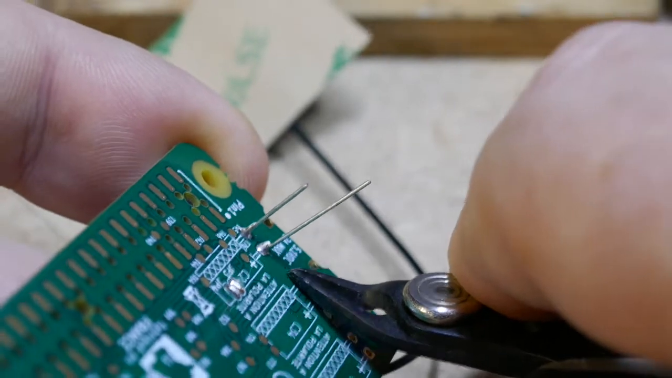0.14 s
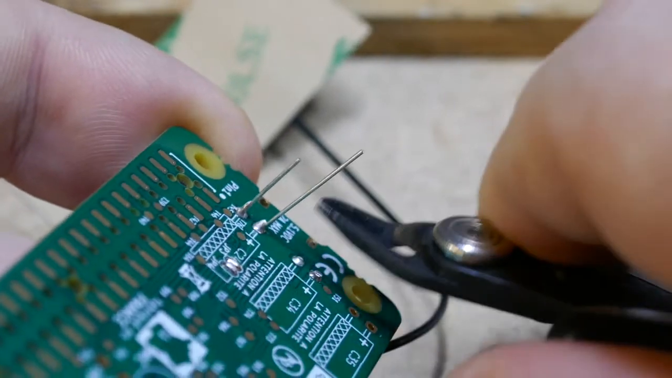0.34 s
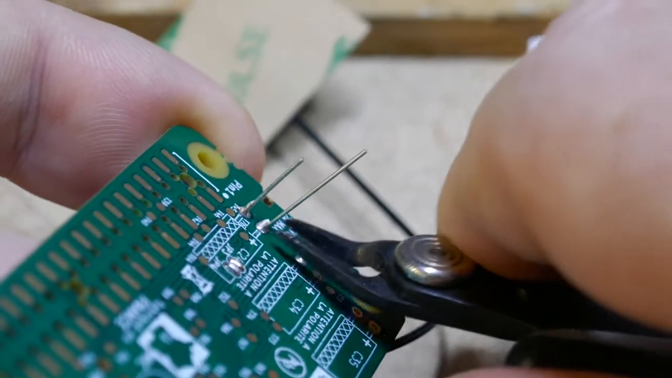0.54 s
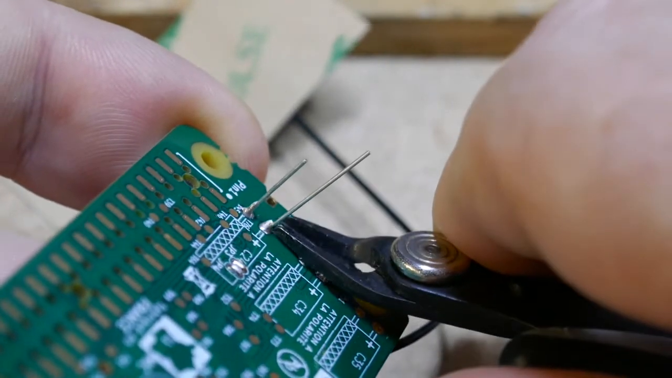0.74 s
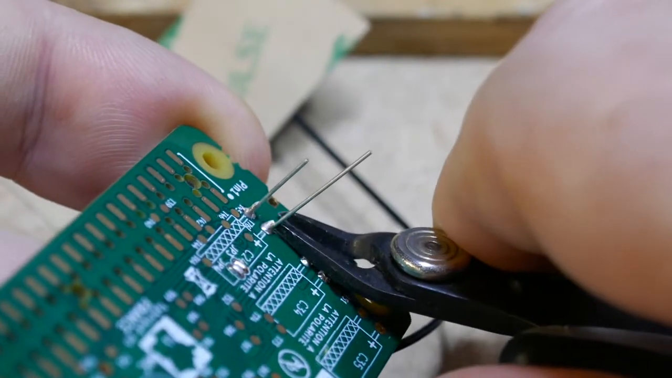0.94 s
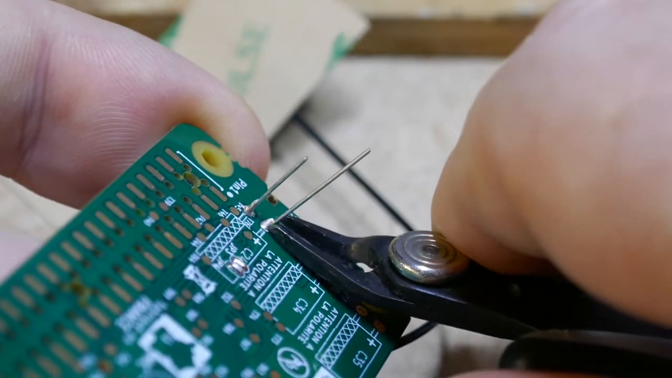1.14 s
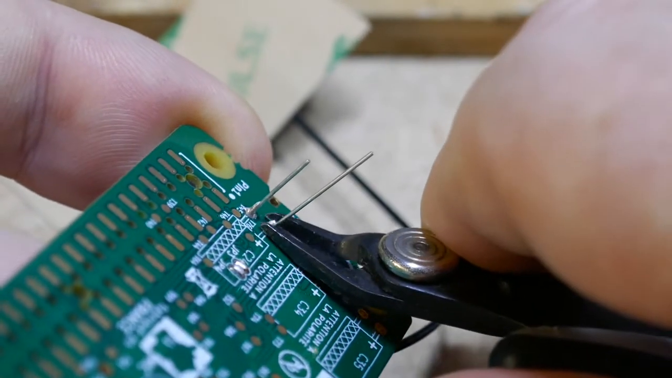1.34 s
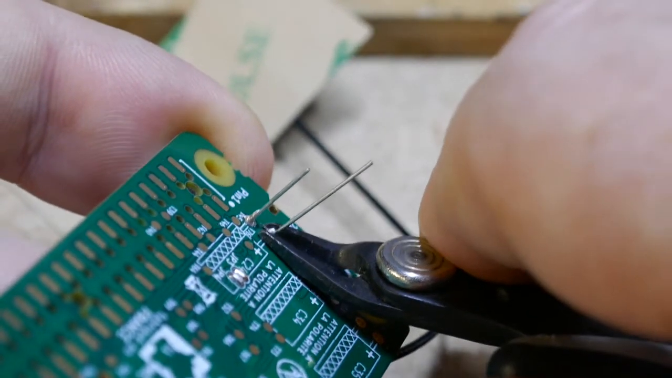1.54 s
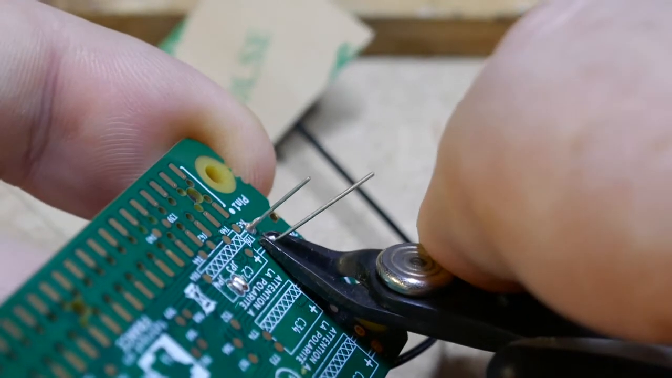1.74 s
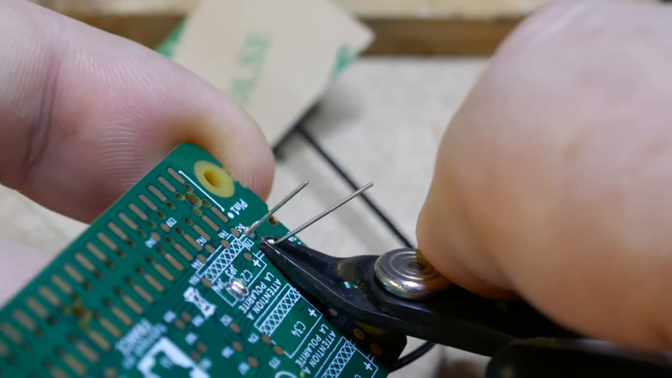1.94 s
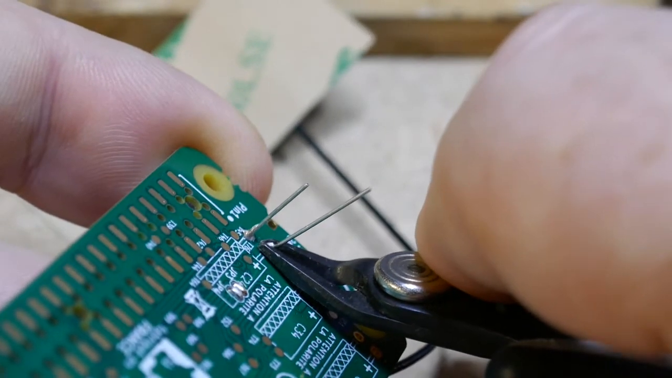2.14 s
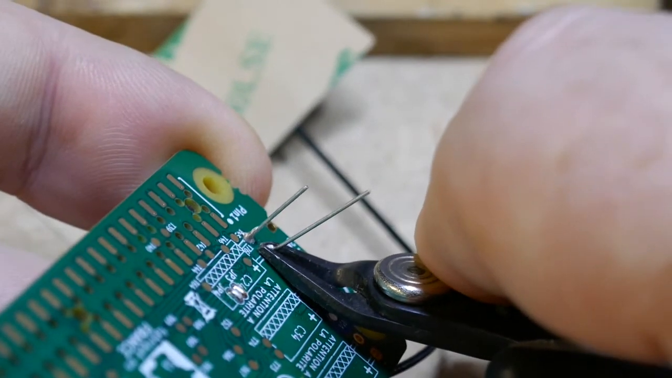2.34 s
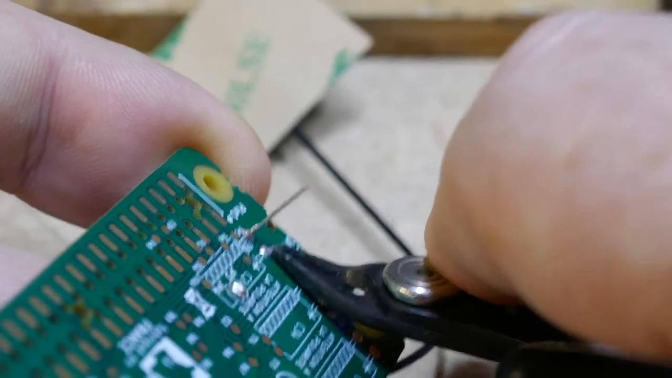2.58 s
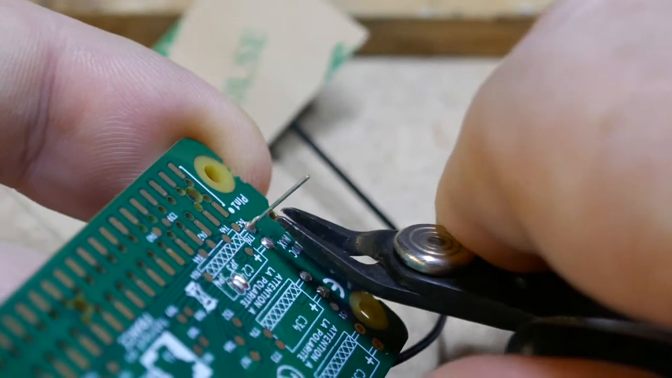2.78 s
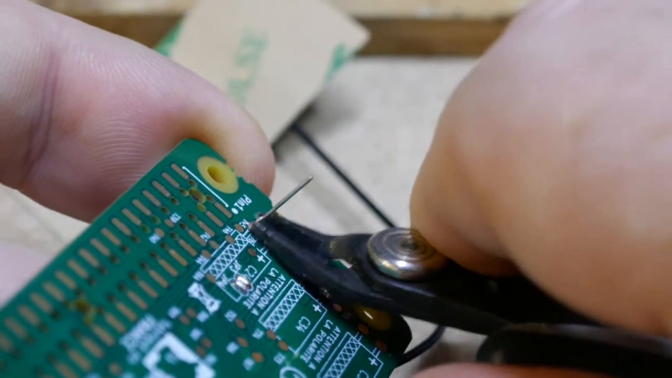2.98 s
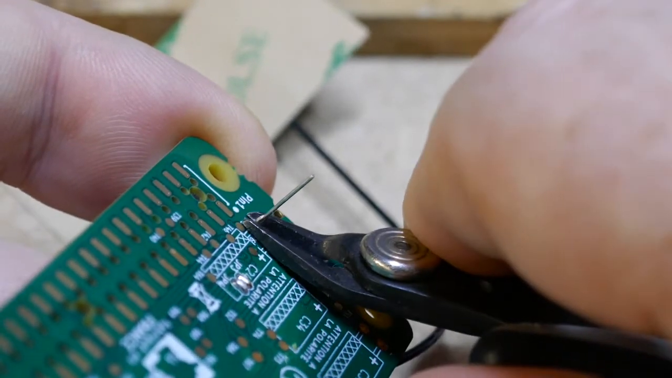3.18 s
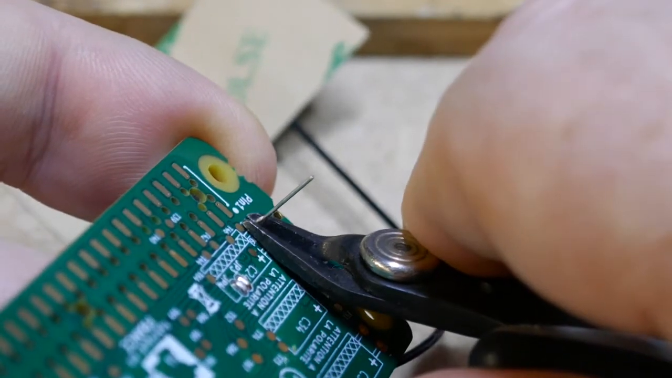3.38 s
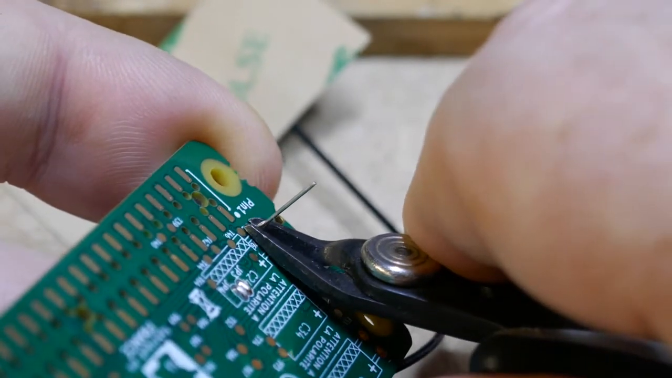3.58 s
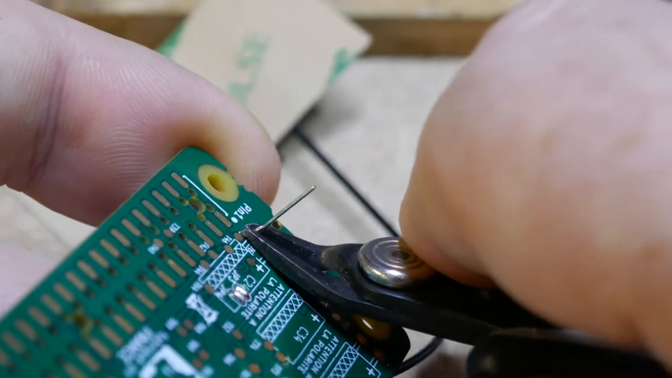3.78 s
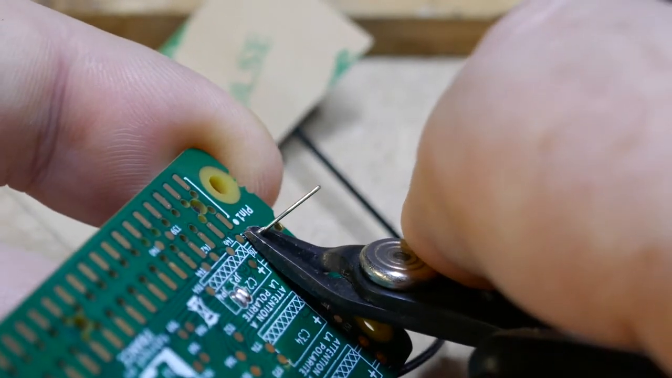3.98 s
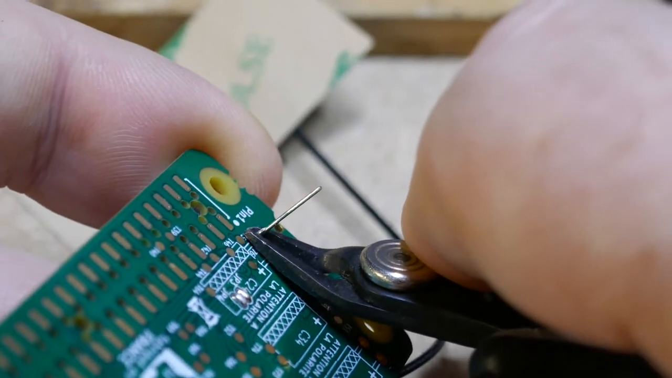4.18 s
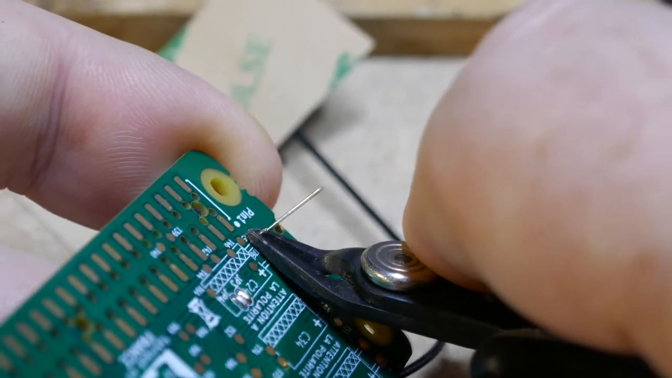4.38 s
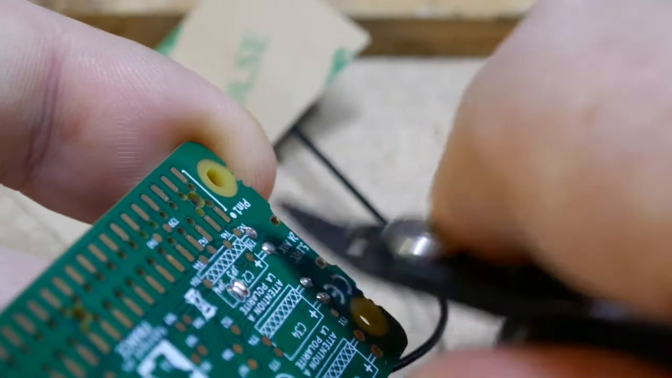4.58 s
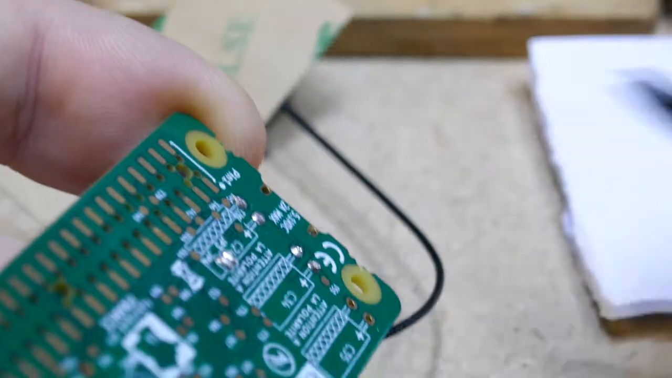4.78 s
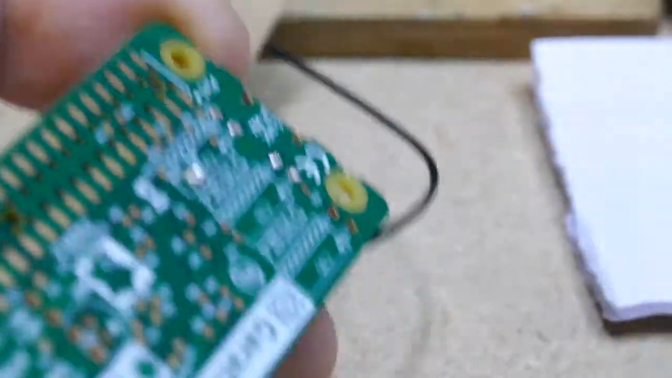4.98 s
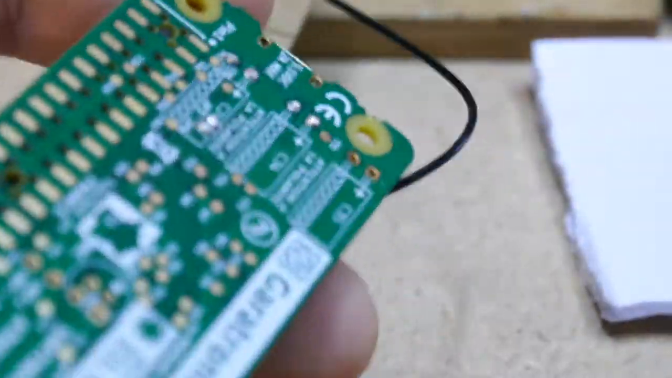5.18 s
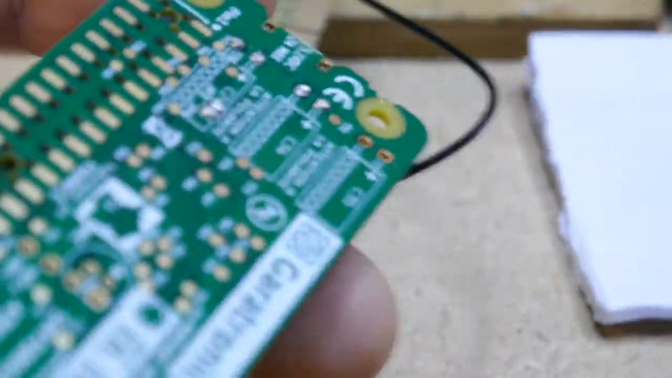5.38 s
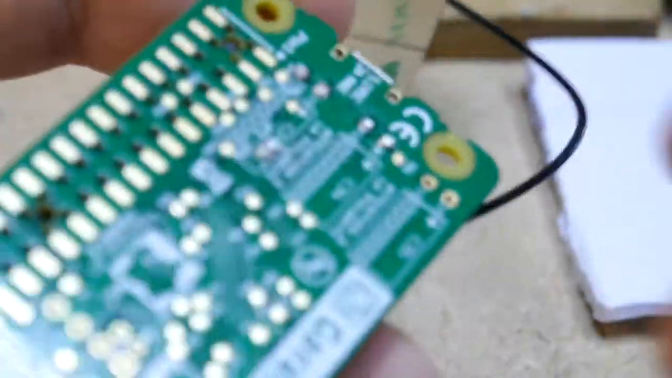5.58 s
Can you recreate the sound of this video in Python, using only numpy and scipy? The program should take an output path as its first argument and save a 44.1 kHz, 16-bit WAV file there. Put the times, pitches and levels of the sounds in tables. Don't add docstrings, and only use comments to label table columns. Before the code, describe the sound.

Hand-held circuit board being trimmed at a workbench, heard very close. Each cut is one crisp, bright steel snap with little body and a short room tail. Long, nearly silent gaps hold only tiny ticks and faint room tone with soft hiss. After the third snap the cutters go down in a woody, rattling clatter with sliding friction, much louder than the snips, and light clicks finish it.

```python
import sys
import numpy as np
from scipy import signal
from scipy.fft import rfft, irfft
from scipy.io import wavfile
from scipy.ndimage import uniform_filter1d

SR = 44100
rng = np.random.default_rng(int(sys.argv[2]) if len(sys.argv) > 2 else 0)


def persist_wave(psi):
    counts = np.round(np.clip(psi, -1, 1) * 32767).astype(np.int16)
    wavfile.write(sys.argv[1], SR, np.atleast_2d(counts).T)


def voltage_ratio(level):
    return 10 ** (np.asarray(level, float) / 20)


N = 247974


def rms_one(x):
    return x / np.sqrt(np.mean(x ** 2) + 1e-20)


def at_hz(points, hz):
    table_hz, value = np.transpose(points)
    return np.interp(np.log(hz), np.log(table_hz), value)


def band(x, low_hz, high_hz):
    return signal.sosfilt(signal.butter(2, [low_hz, high_hz], "band", fs=SR, output="sos"), x)


def sides(pan_db):
    return voltage_ratio(np.array([[0.5], [-0.5]]) * pan_db)


def widen(shared, own, share):
    return shared + share * own * np.array([[1], [-1]])


def add(out, start_s, sound):
    at = round(start_s * SR)
    out[:, at:at + sound.shape[1]] += sound[:, :N - at]


def resonate(x, peaks, scatter_db=0):
    out = 0
    for k, (hz, width_hz, level_db) in enumerate(peaks):
        r = np.exp(-np.pi * width_hz / SR)
        w = 2 * np.pi * hz / SR
        strength = voltage_ratio(level_db + scatter_db * rng.standard_normal())
        gain = strength * (-1) ** k * (1 - r * r) / 2
        out = out + signal.lfilter([gain, 0, -gain], [1, -2 * r * np.cos(w), r * r], x)
    return out


# pitch_hz, width_hz, level_db
BASS = [(770, 200, 0), (1200, 240, 5), (1544, 470, 3.5)]
MID = [(2250, 990, 1), (2514, 240, 14), (3740, 1250, -6)]
UPPER = [(3530, 380, 0), (4680, 550, 6), (5780, 1740, -6.5)]
TREBLE = [(7130, 660, 0.5), (8570, 650, 2.5), (9960, 1530, 5), (11350, 1300, 4.5), (11990, 1770, 5.5),
          (16300, 7200, -5.5)]
# resonances, low_edge_hz, high_edge_hz
REGISTERS = [(BASS, 400, 2200), (MID, 1600, 3900), (UPPER, 3400, 7000), (TREBLE, 6300, 18000)]


def registers(x, scatter_db):
    return [(-1) ** k * band(resonate(x, peaks, scatter_db), low_hz, high_hz)
            for k, (peaks, low_hz, high_hz) in enumerate(REGISTERS)]


def contacts(table, crack, trims_db, scatter_db, spread):
    near, around = np.zeros((2, 2, N))
    t_ms = np.arange(2048) / SR * 1000
    smooth = [band((-1.0) ** k * (t_ms == 0), low_hz, high_hz)
              for k, (_, low_hz, high_hz) in enumerate(REGISTERS)]
    for start_s, peak_db, bass_db, treble_db, pan_db, burst_ms in table:
        shared, own = rng.standard_normal((2, 2048)) * np.exp(-t_ms / burst_ms)
        shared[0] = crack
        burst = rfft(widen(shared, own, spread))
        burst = irfft(burst / uniform_filter1d(np.abs(burst), size=9)) * (t_ms < 40)
        upper_db = 0.36 * min(treble_db, 0)
        levels_db = peak_db + np.array([bass_db, 0, upper_db, treble_db]) + trims_db
        layers = [voltage_ratio(level_db) * x / np.abs(x).max()
                  for level_db, x in zip(levels_db, registers(burst, scatter_db))]
        add(near, start_s, sides(pan_db) * sum(layers))
        diffuse = sum(np.std(x) * rms_one(y) for x, y in zip(layers, smooth))
        add(around, start_s, sides(0) * diffuse)
    return np.array([near, around])


# start_s, peak_db, treble_minus_mid_db, left_minus_right_db, burst_ms
CUTS = [
    (0.073, -20, 4.5, -1, 1.04),
    (2.4934, -19, 5, -0.5, 0.51),
    (4.4308, -17, 3.5, 2, 0.31),
]
# pitch_hz, width_hz, level_db
JAW_RINGS = [(3300, 1200, -1.5), (12900, 1300, 1.5)]


def snips():
    bass_db = -25
    rows = [(start_s, peak_db, bass_db, treble_db, pan_db, burst_ms)
            for start_s, peak_db, treble_db, pan_db, burst_ms in CUTS]
    cuts = contacts(rows, 1.0, [15.0, -4.5, -1.5, 3.0], scatter_db=1.5, spread=0.23)
    cuts = cuts + sum(resonate(cuts, [ring]) for ring in JAW_RINGS)
    gap_hz, gap_width_hz, gap_share = 1400, 1000, 0.85
    return cuts - gap_share * resonate(cuts, [(gap_hz, gap_width_hz, 0)])


# start_s, peak_db, bass_minus_mid_db, treble_minus_mid_db
TICKS = [(0.2733, -35.5, 0.5, 13.5), (1.2257, -50.5, -26, 11.5), (2.6515, -33.5, 3.5, 4),
         (2.8457, -31, -4, 5.5), (2.8503, -34.5, -12, 13.5), (2.9421, -43.5, -3, 11),
         (2.9732, -62, -10, 18), (2.9952, -45.5, -3, 15), (2.9977, -46.5, -24, 15), (3.0758, -51, 3.5, 16),
         (3.153, -61.5, 9, 17), (4.1806, -53, -16, 14.5), (4.5408, -56, 5, 9), (4.789, -54, 6, 5),
         (5.5086, -38.5, -22, 16.5), (5.574, -38, -6, 5)]


def ticks():
    pan_db, burst_ms = 0.3, 1
    rows = [(*row, pan_db, burst_ms) for row in TICKS]
    return contacts(rows, 3.6, [0.99, -2.0, 2.2, 0.45], scatter_db=4, spread=0.39)


# start_s, peak_db, bass_minus_mid_db, treble_minus_mid_db
TAPS = [(0.641, -40.5, -7.5, -29), (0.714, -55, -7, -23), (1.311, -45, -6.5, -8), (2.5926, -33, -6.5, -38),
        (2.6404, -18, -19, -6.5), (3.0026, -40, -7, -13), (3.055, -42, -11, -1), (4.6222, -59, -6, -1),
        (5.0765, -50, 15.5, -12), (5.1578, -10, -7.5, -22), (5.1852, -39, 13, 4), (5.2105, -19, 11.5, -27),
        (5.6047, -30, -12, -3)]


def taps():
    pan_db, burst_ms = -1, 0.7
    rows = [(*row, pan_db, burst_ms) for row in TAPS]
    return contacts(rows, 1.54, [2.1, -1.7, 0.42, 0.86], scatter_db=4, spread=0.21)


# start_s, peak_db, bass_minus_mid_db, treble_minus_mid_db, burst_ms
SLIPS = [(0.3218, -46, -11, 8.5, 6.4), (0.374, -51.5, -10, 10, 19), (0.4076, -44, -16, -8, 5.9),
         (2.503, -58, -1, 2.5, 8.8), (2.645, -38, -8, -2, 9.4), (2.6795, -38, -5, 8.5, 2.1),
         (4.4484, -76, -21, 26, 1.7), (4.466, -54.5, -28, 21.5, 5.1), (4.8191, -45, 4, -1.5, 9),
         (5.0999, -37.5, -10, -17, 4.9), (5.118, -32.5, -2.5, -18, 4), (5.237, -27.5, -1, 4, 16.3),
         (5.3018, -25, -7.5, -8, 8.2), (5.3112, -27, -10, 1.5, 8.8), (5.3735, -39, -7, 9.5, 8.4),
         (5.5065, -28.5, -17, -6, 8.8), (5.5285, -19, -50, 3, 2.9)]


def slips():
    pan_db = 0.1
    rows = [(*row, pan_db, burst_ms) for *row, burst_ms in SLIPS]
    return contacts(rows, 0.53, [6.0, -3.5, -1.3, 0.5], scatter_db=7.0, spread=0.45)


# pitch_hz, level_db, t60_s
BENCH_MODES = [(89, 2, 0.089), (149, -12, .05), (209.5, -7, 0.1), (374, -7.5, 0.075), (562, 3, 0.036),
               (800, 5.5, 0.031), (877, -13.5, 0.033), (1180, -25, 0.033), (1410, -1.5, 0.0094)]


def blows(table, ring_db):
    out = np.zeros((2, N))
    t = np.arange(8192) / SR
    for start_s, peak_db, pitch_hz, pan_db, t60_s in table:
        push = 0.8 * (t < 1 / pitch_hz)
        blow = np.sin(2 * np.pi * pitch_hz * t) * (push + voltage_ratio(-60 * t / t60_s))
        for mode_hz, level_db, mode_t60_s in BENCH_MODES:
            distance_octaves = abs(np.log2(mode_hz / pitch_hz))
            mode_db = level_db + ring_db - 1.7 * distance_octaves + 2 * rng.standard_normal()
            blow = blow - voltage_ratio(mode_db - 60 * t / mode_t60_s) * np.sin(2 * np.pi * mode_hz * t)
        add(out, start_s, sides(pan_db) * voltage_ratio(peak_db - 1.5) * blow / np.abs(blow).max())
    return band(band(out, 123, 5200), 112, 4500)


# start_s, peak_db, pitch_hz, left_minus_right_db
KNOCKS = [(4.695, -44.5, 217, 2), (4.874, -20.5, 217, 3), (4.913, -36.5, 160, -4), (5.077, -36.5, 270, -5),
          (5.117, -33, 1200, -11), (5.158, -14, 846, -4.5), (5.166, -23, 146, 4), (5.175, -16, 180, 0),
          (5.1745, -33, 665, -3), (5.184, -25.5, 640, 1), (5.185, -16.5, 187, 1.5),
          (5.192, -8.5, 786, -3.5), (5.196, -18, 178, 0.1), (5.2055, -11.5, 800, -2.5),
          (5.222, -16, 375, 2), (5.234, -9.5, 915, -6), (5.265, -19.5, 800, -0.6), (5.294, -26, 729, 2),
          (5.342, -42, 156, 1.1), (5.385, -32, 195, -3), (5.411, -39.5, 232, 2), (5.446, -41, 199, -5)]


def knocks():
    t60_s = 0.04
    return blows([(*row, t60_s) for row in KNOCKS], ring_db=-7.5)


# start_s, peak_db, pitch_hz
RECOILS = [
    (0.074, -33, 325),
    (0.276, -43, 152),
    (2.492, -34.5, 288),
    (2.64, -37, 372),
    (2.651, -35, 430),
    (4.431, -32.5, 390),
]


def recoils():
    pan_db, t60_s = 0, 0.01
    return blows([(*row, pan_db, t60_s) for row in RECOILS], ring_db=-19.5)


# start_s, peak_db, pitch_hz, left_minus_right_db
PINGS = [(0.075, -29, 1290, -6), (0.2728, -39, 1300, .3), (0.6427, -44, 2810, 2), (1.3092, -37, 2790, -0.6),
         (1.3098, -50, 1340, .3), (2.6402, -17, 1475, 1), (2.642, -20.5, 1200, -1), (5.1587, -6, 2610, -5),
         (5.51, -28.5, 1220, .3), (5.5088, -27.5, 1660, -3), (5.2099, -4, 1294, -12),
         (5.6057, -23.5, 3240, -1.1)]


def pings():
    t60_s = 0.021
    return band(blows([(*row, t60_s) for row in PINGS], ring_db=-46.0), 1240, 4000)


# time_s, pressure_db, speed_db
SCUFFS = [
    [(0.372, -66.5, 12), (0.42, -66.5, 1.5), (0.475, -65.5, -3)],
    [(4.8, -73, -3), (4.848, -56, -6), (4.97, -66.5, -3.5), (5.14, -44.5, -19.5), (5.246, -35, -28),
     (5.3, -37.5, -11), (5.438, -53.5, -16), (5.514, -60, -7), (5.62, -65, 5)],
]


def scuff():
    out = np.zeros((2, N))
    t = np.arange(N) / SR
    grain_rate_hz = 2500
    struck = rng.random((2, N)) < grain_rate_hz / SR
    grain_db = 2.0 * np.minimum(rng.exponential(1, (2, N)), 2)
    coarse = struck * voltage_ratio(grain_db) * rng.choice([-1, 1], (2, N))
    clumps = uniform_filter1d(rng.standard_normal(N), size=300) * np.sqrt(300)
    fine = rng.standard_normal((2, N)) * voltage_ratio(1.2 * clumps)
    coarse, fine = (widen(*grains, 0.14) + 1e-18 for grains in (coarse, fine))
    bench = [(118, 17, 7.0), (186, 26, 11), (375, 760, -0.5), (700, 500, 5), (1100, 880, -3)]
    rumble = band(resonate(coarse, bench), 104, 2800)
    bass, mid, upper, hiss = registers(fine, 0)
    rasp = mid + 1.5 * upper + 0.18 * bass
    for rows in SCUFFS:
        time_s, pressure_db, speed_db = np.transpose(rows)
        start_s, end_s, fade_s = time_s[0], time_s[-1], 0.004
        inside = np.interp(t, [start_s - fade_s, start_s + fade_s, end_s - fade_s, end_s + fade_s],
                           [0, 1, 1, 0])
        layers = [(rumble, 0, -3.0), (rasp, 0.5 + 0.94 * speed_db, -1.5), (hiss, speed_db, 0.8)]
        for layer, extra_db, pan_db in layers:
            level_db = np.interp(t, time_s, pressure_db + extra_db)
            out += inside * voltage_ratio(level_db) * rms_one(layer) * sides(pan_db)
    return out


# delay_ms, level_db
ECHOES = [(2.6, -13.5), (7.0, -16.5), (21.0, -27)]
# centre_hz, t60_s, tail_db
TAIL = [(314, 0.11, -27), (1200, 0.13, -19), (3380, 0.32, -13.5), (6550, 0.33, -17), (12000, 0.35, -17)]


def room(near, around):
    t = np.arange(SR // 2) / SR
    early = np.zeros((2, SR // 20))
    late = 0
    shared, own = rng.standard_normal((2, SR // 2))
    for hz, t60_s, tail_db in TAIL:
        tail = band(widen(shared, own, 0.43), hz * 0.35, min(hz * 1.54, 19000))
        envelope = voltage_ratio(tail_db - 60 * t / t60_s) * np.minimum(t / 0.0078, 1)
        late = -late + envelope * tail / np.sqrt(t60_s * SR / 14)
    early[:, 0] = 1
    for delay_ms, level_db in ECHOES:
        early[[0, 1], round(delay_ms * SR / 1000) + np.array([0, 3])] += voltage_ratio(level_db)
    direct = signal.fftconvolve(near, early, axes=1)[:, :N]
    return direct + signal.fftconvolve(around, late, axes=1)[:, :N]


# pitch_hz, level_db_per_hz
AIR = [(20, -15), (50, -13.5), (110, -3), (200, 0.5), (450, 1), (900, -7.5), (2000, -16.5), (3800, -25)]
# pitch_hz, level_db_per_hz
HISS = [(6500, -26), (8300, -27.5), (9200, -20.5), (11000, -18.5), (15600, -28.5), (16000, -56)]
# pitch_hz, width_hz, level_db
AIR_HUMPS = [(450, 26, 4), (824, 69, 6), (1536, 295, 8), (2396, 560, 7), (4910, 850, 5)]
# pitch_hz, likeness
LIKENESS = [(60, -0.48), (130, -0.67), (290, -0.59), (640, -0.46), (1410, -0.062), (3100, 0.66),
            (6820, -0.16), (15000, 0.53)]
# time_s, level_db
AIR_LEVEL = [(0.0, -61.5), (2.25, -64.5), (2.74, -62.5), (3.33, -63.5), (4.26, -63.5), (4.74, -62),
             (5.15, -60), (5.26, -58.5), (5.62, -62.5)]


def room_tone():
    hz = np.maximum(np.arange(N // 2 + 1) * SR / N, 1)
    shape_db = at_hz(AIR + HISS, hz)
    for hump_hz, width_hz, level_db in AIR_HUMPS:
        shape_db = shape_db + level_db / (1 + (2 * (hz - hump_hz) / width_hz) ** 2)
    alike = at_hz(LIKENESS, hz)
    spectrum = rfft(rng.standard_normal((2, N))) * voltage_ratio(shape_db)
    mid, side = irfft(spectrum * np.sqrt([1 + alike, 1 - alike]), N)
    time_s, level_db = np.transpose(AIR_LEVEL)
    level = voltage_ratio(np.interp(np.arange(N) / SR, time_s, level_db))
    return level * np.array([mid + side, mid - side]) / np.std(mid)


def scene():
    thuds = knocks() + recoils() + pings()
    close = snips() + ticks() + taps() + slips() + thuds + scuff()
    dip_hz, dip_width_hz, dip_share = 7060, 1000, 0.36
    close = close - dip_share * resonate(close, [(dip_hz, dip_width_hz, 0)])
    hum_hz, hum_width_hz, hum_db = 191.5, 13, -3
    hum = resonate(thuds, [(hum_hz, hum_width_hz, hum_db)])
    return room(*close) + hum + room_tone()


def roll_off(x):
    return signal.sosfilt(signal.butter(12, 17030, fs=SR, output="sos"), x)


def record(dry):
    stop_hz = 17100
    mix = signal.sosfilt(signal.cheby2(10, 60, stop_hz, fs=SR, output="sos"), dry)
    return roll_off(mix)


dry = scene()
out = record(dry)
persist_wave(out)
```